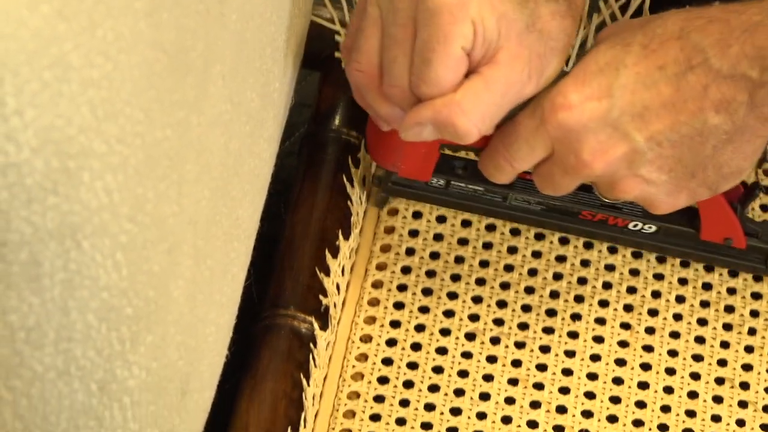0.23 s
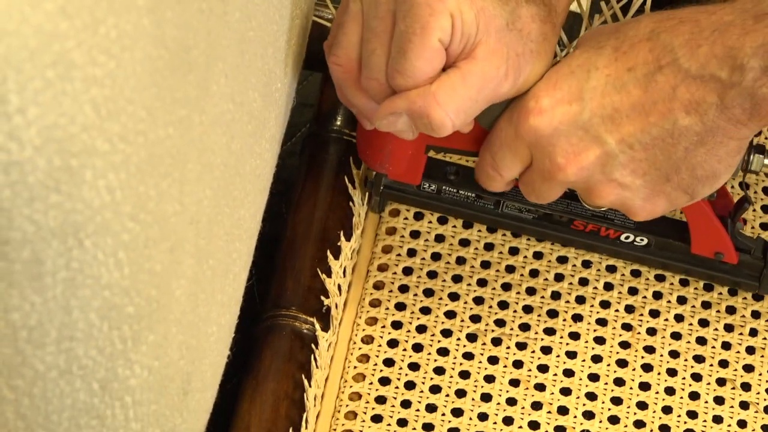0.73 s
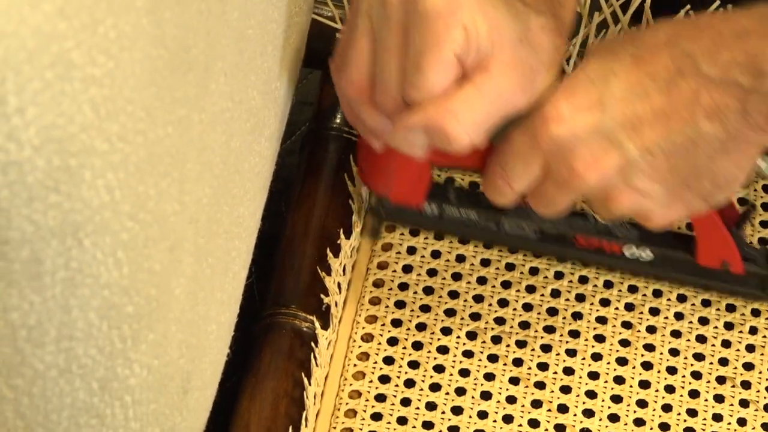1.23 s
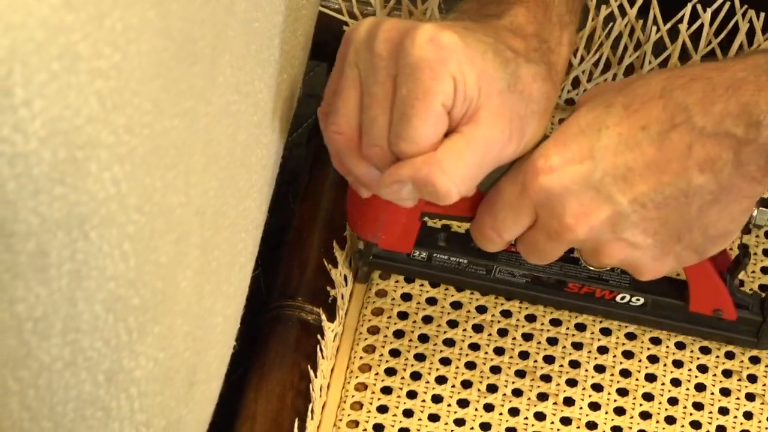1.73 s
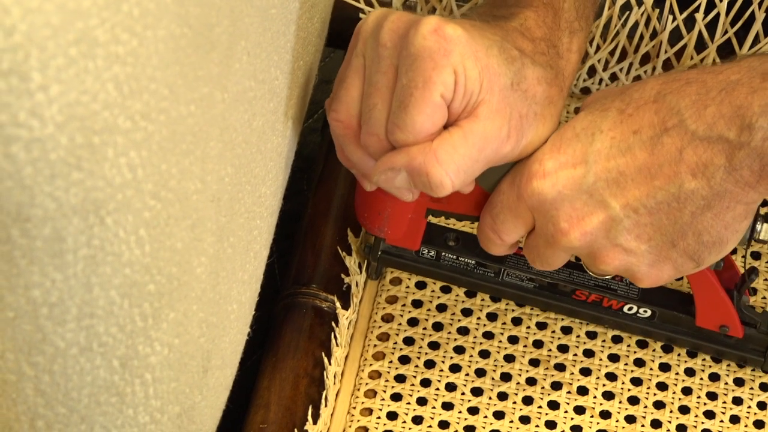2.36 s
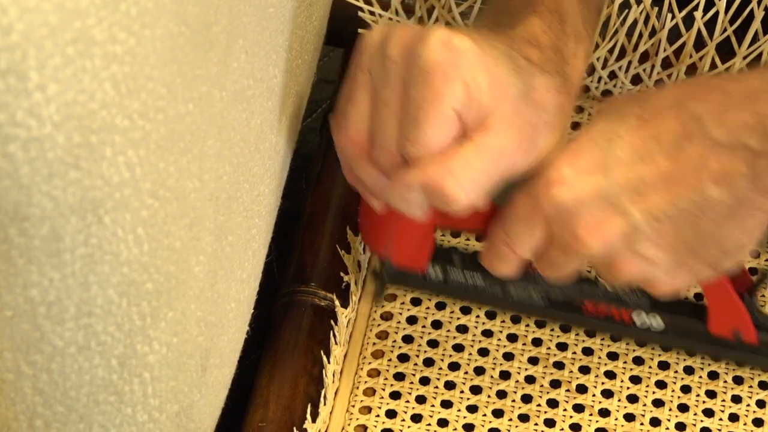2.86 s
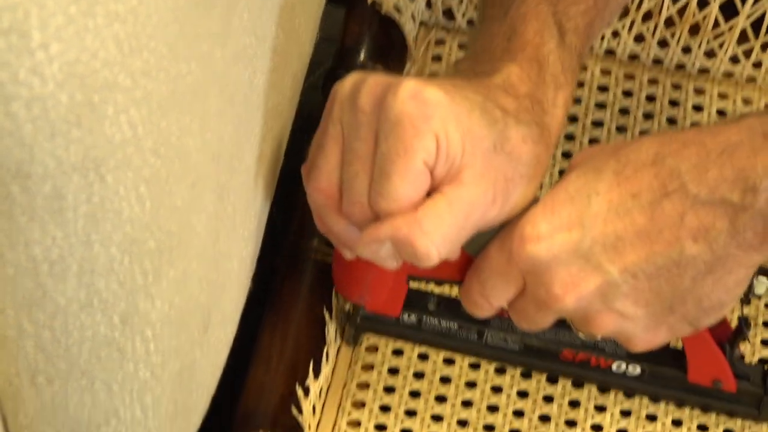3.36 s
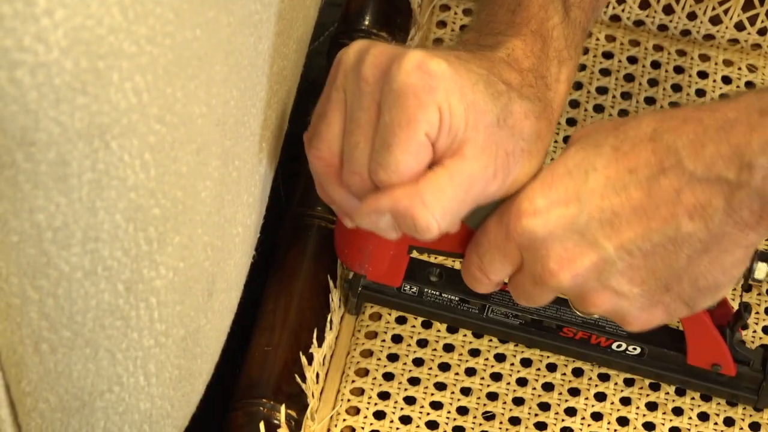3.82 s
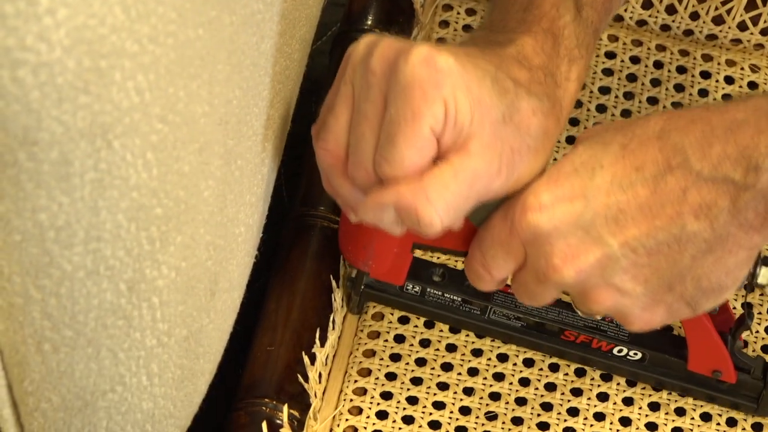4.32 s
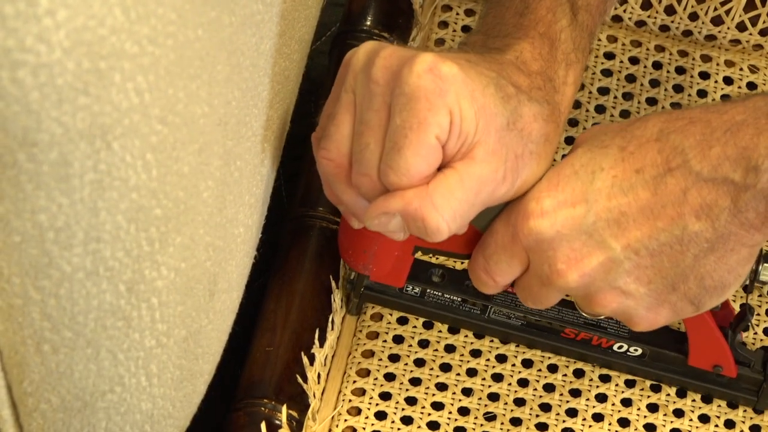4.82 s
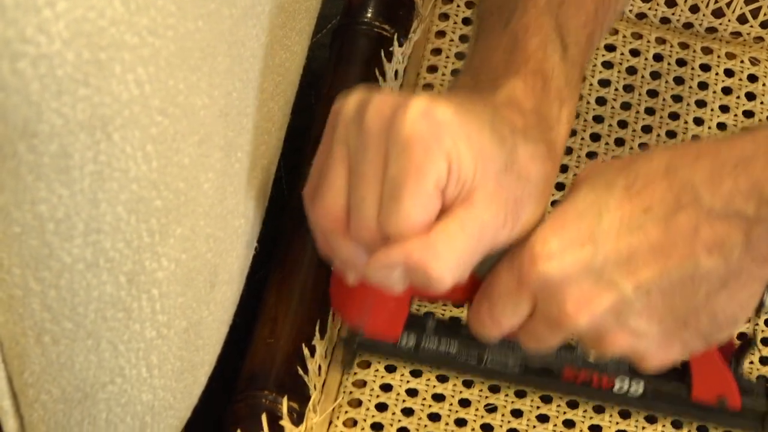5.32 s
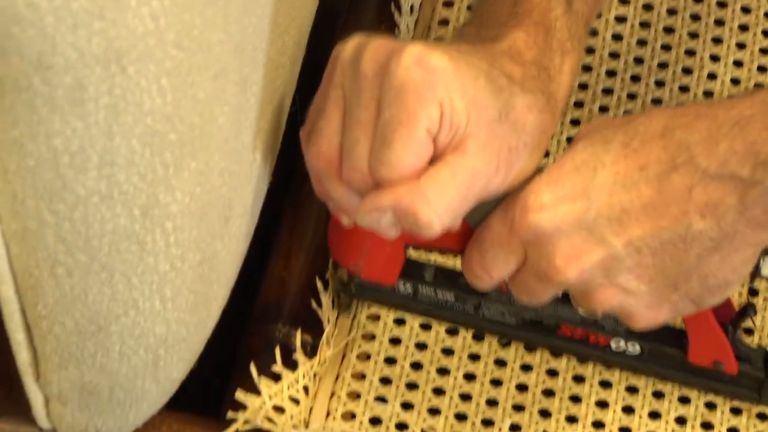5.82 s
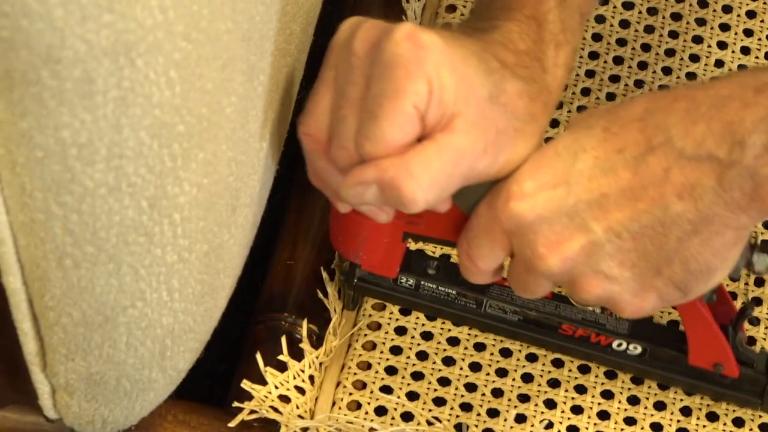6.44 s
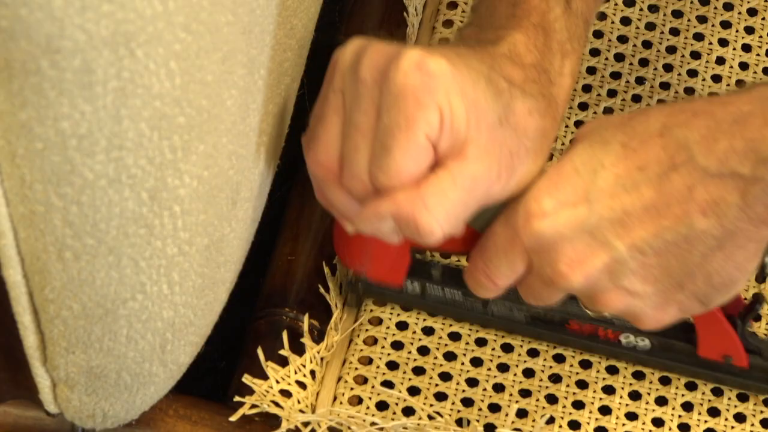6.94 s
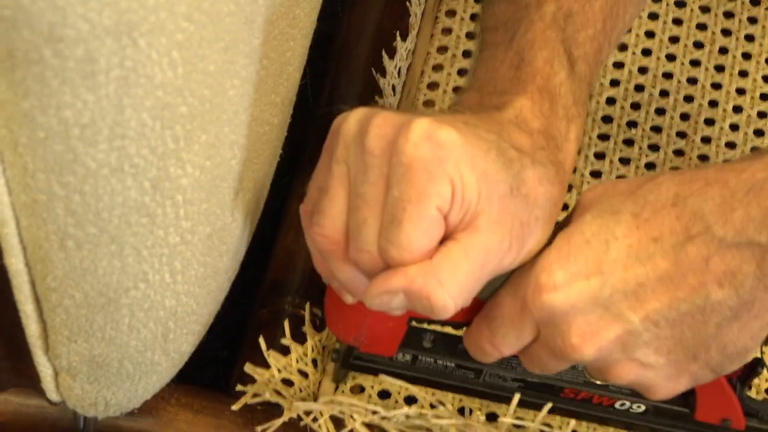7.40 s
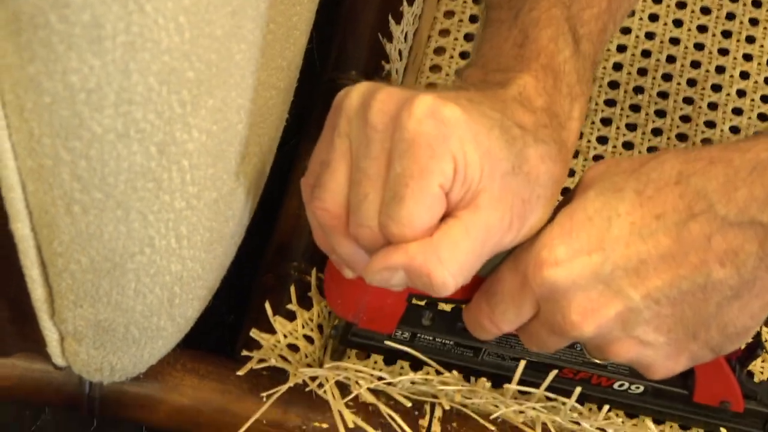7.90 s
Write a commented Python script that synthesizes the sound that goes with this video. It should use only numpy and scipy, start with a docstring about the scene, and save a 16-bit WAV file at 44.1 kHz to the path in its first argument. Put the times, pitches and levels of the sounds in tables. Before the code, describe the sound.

A close, mostly centred stereo view of an air stapler working on a wooden chair with cane webbing, in a lively workshop. Low motor hum, rumble and soft hiss run throughout, the hum drifting in level. Faint rubs, taps and dry ticks open the scene. At about 1.0 s a quick air spit leads into a loud, compressed crack with woody boom, an uneven exhaust rush, then a clack and snap a tenth of a second later; a trigger click follows at 1.4. A second shot lands at 2.7 after a longer spit. A small metallic rattle at 3.4 and soft knocks precede the third, at 5.0, its spit and rush stronger. Around 6.0 sharp little clicks and cane rubbing appear; the steel nose catches at 6.7, and the fourth shot at 6.8 booms heaviest with a higher metallic ring. Bright clicks at 7.2, then rubs and light taps to about 8.1.

```python
"""Four sharp cracks, each with a woody boom, a rush of air and a clack; clicks, rubs and a hum between them.
A pneumatic stapler fixes cane webbing to a wooden chair frame in a live workshop. Per shot: the trigger valve
spits, the driver slams the staple home, the cylinder exhausts, the piston clacks back. Air and contacts are
coloured noise, often through resonators; the frame is decaying sine modes, the motor is steady sines. Room
reflections are decaying noise; the recorder's limiter squashes the blows."""
import sys
import numpy as np
from scipy import signal
from scipy.fft import rfft, irfft
from scipy.io import wavfile
from scipy.ndimage import uniform_filter1d, minimum_filter1d

SR = 44100
rng = np.random.default_rng(int(sys.argv[2]) if len(sys.argv) > 2 else 0)


def transcribe(u):
    """Save the signal u as a 16-bit wav file named by the first command-line argument.

    u: samples, shape (n,) or (channels, n), limited to [-1, 1]; the rate is SR.
    q: integer samples, one column per channel.
    """
    v = np.clip(np.atleast_2d(u).T, -1, 1)
    q = np.round(v * 32767).astype(np.int16)
    wavfile.write(sys.argv[1], SR, q)


N = 360297
TIME_S = np.arange(N) / SR

# Shots. Each row: driver strike in seconds, trigger hold in seconds, valve lead in seconds, spit in dB,
# crack in dB, push on the frame in dB, rush in dB, rail pitch in Hz, rail ring in dB.
SHOTS = [(1.0367, 0.088, 0.04, -15, 2, -8.5, -11.5, 646, -16.5),
         (2.6817, 0.11, 0.085, -13.5, -1, -7, -15.5, 607, -14),
         (5.025, .1032, .051, -9, 2.5, -12, -9.5, 462, -10.5),
         (6.800, 0.11, 0.044, -14, -0.5, 0, -11.5, 1060, -8.5)]
# Driver blow. Each row: frequency in Hz, relative density in dB per Hz.
CRACK_SPECTRUM = [(30, -18), (100, 2), (350, -2), (700, -2), (1100, 11.5), (2000, 3), (5000, -6.5),
                  (8000, -7.5), (10500, -13), (13500, -13), (16000, -81)]
# Piston return. Each row: frequency in Hz, relative density in dB per Hz.
CLACK_SPECTRUM = [(30, 1), (200, 13.5), (600, -5.5), (1200, 14), (2600, 2), (5500, 3.5), (8500, -1),
                  (10500, -3.5), (13500, -1), (16000, -21)]
# Valve reseating and cane ticks. Each row: frequency in Hz, relative density in dB per Hz.
SNAP_SPECTRUM = [(30, -23), (600, -1), (1500, -12), (3500, 3), (5500, 5), (8500, -3.5), (10500, -32),
                 (13500, -11), (16000, -51)]
# Stapler housing resonances. Each row: centre in Hz, width in Hz, relative level in dB.
HOUSING_MODES = [(597, 60, -3), (897, 50, -18), (1013, 94, -4), (1340, 42, -12.5), (1437, 62, 0),
                 (1549, 67, -0.5), (1975, 56, 2), (2350, 280, -12), (3600, 290, -6)]
# Chair frame modes. Each row: frequency in Hz, level in dB, 60 dB decay time in seconds.
FRAME_MODES = [(101.4, -22.5, 0.5), (117.6, -18, 0.97), (156.6, -4.5, 0.29), (170.9, -10.5, 0.46),
               (204.4, -16.5, 0.74), (235.7, -26.5, 0.8), (271.8, -15.5, 0.47), (309.4, -17.5, 0.59),
               (336.3, -25, 0.48), (419.3, -35.5, 0.45), (467, -25, 0.19), (534, -26.5, 0.2)]
# Cylinder exhaust. Each row: frequency in Hz, relative density in dB per Hz.
RUSH_SPECTRUM = [(30, -30), (100, 1.5), (280, -3.5), (600, 0), (1100, -3), (2000, -3.5), (5000, -5.5),
                 (8000, -12.5), (10300, -19), (13000, -17), (16000, -30)]
# Trigger valve jet. Each row: frequency in Hz, relative density in dB per Hz.
SPIT_SPECTRUM = [(35, -37), (150, 1), (800, -7.5), (1500, -0.5), (2000, -9), (3500, 1), (7000, 4.5),
                 (10500, 3), (13500, 4), (16000, 2)]
# Tool set down or knocked, wood and cane rubbed. Each row: start in seconds, level in dB, centre in Hz,
# fade in seconds.
TAPS = [(.311, -39.5, 514, .035), (.066, -33, 2300, .003), (.378, -37, 13000, .0036),
        (0.712, -33.5, 5800, .0072), (0.9015, -37, 2190, 0.025), (1.62, -39.5, 5800, 0.057),
        (2.322, -44, 1640, 0.068), (2.578, -26.5, 1750, 0.0064), (3.409, -35, 4250, 0.045),
        (3.547, -33.5, 1160, 0.077), (3.633, -31, 6500, 0.0023), (3.835, -32, 610, 0.028),
        (4.913, -35.5, 1410, .033), (5.968, -26, 5070, 0.018), (6.0043, -15, 6550, 0.00087),
        (6.0286, -32.5, 1880, 0.014), (6.1333, -28.5, 2320, 0.0045), (6.551, -36, 3830, 0.037),
        (7.171, -23, 4500, 0.014), (7.192, -19.5, 2450, 0.0047), (7.552, -33.5, 3740, 0.042),
        (7.713, -33.5, 2650, 0.011), (8.0303, -36.5, 4540, 0.0055), (8.08, -33, 2170, 0.0062)]
# Staple magazine rattles. Each row: start in seconds, level in dB.
CLINKS = [(3.416, -36)]
# Steel magazine resonances. Each row: centre in Hz, width in Hz, relative level in dB.
MAGAZINE_MODES = [(3520, 270, -9), (5540, 600, -3), (6400, 260, -2), (7540, 200, 0), (12200, 1500, -21)]
# Tool nose snaps down or drags. Each row: start in seconds, level in dB, fade in seconds.
CATCHES = [(6.6638, -25, 0.018), (6.676, -25, 0.033), (7.22, -49, 0.093), (7.471, -53, 0.099)]
# Steel nose resonances. Each row: centre in Hz, width in Hz, relative level in dB.
NOSE_MODES = [(516, 40, 3), (865, 65, -3), (1420, 300, -9), (2290, 330, 4), (3600, 210, -11),
              (4020, 250, -15), (5460, 1000, -46)]
# Trigger springs back. Each row: start in seconds, level in dB.
TRIGGER_CLICKS = [(1.4167, -31), (7.5617, -40)]
# Trigger resonances. Each row: centre in Hz, width in Hz, relative level in dB.
TRIGGER_MODES = [(960, 150, -1), (1470, 230, 2), (3330, 410, -2), (5360, 370, 0), (8500, 650, -8.5),
                 (12800, 2500, -16)]
# Hands slide over cane and frame. Each row: start in seconds, level in dB, fade in seconds.
RUBS = [(0, -38, 0.096), (.3, -52.5, 0.9), (.85, -51, 0.21), (1.95, -56, .25), (3.55, -48.5, 0.24),
        (6.0, -42, 0.2), (7.2, -41.5, 0.24), (7.85, -50.5, 0.97)]
# Sliding friction. Each row: frequency in Hz, relative density in dB per Hz.
RUB_SPECTRUM = [(40, -4.5), (200, 3.5), (400, 3), (800, -5), (2400, -9), (6000, -13), (10000, -25.5),
                (16000, -31)]
# Motor lines. Each row: frequency in Hz, relative level in dB.
HUM_LINES = [(59.2, 1), (118.4, -2.5), (177.6, -4.5), (236.9, -7.5)]
# Hum level over time. Each row: time in seconds, level in dB.
HUM_LEVEL = [(0.0, -63), (0.91, -46), (1.32, -53), (3.43, -59), (4.12, -47), (4.69, -51), (6.67, -58.5),
             (8.17, -50)]
# Workshop air noise. Each row: frequency in Hz, relative density in dB per Hz.
AIR_SPECTRUM = [(15, -10), (25, -4.5), (59, 3), (185, 1.5), (236, -1), (285, -7.5), (659, -17),
                (1020, -17.5), (1190, -19), (2350, -25.5), (5000, -27), (9840, -38), (12900, -32.5),
                (14800, -42), (16000, -92)]
# Reflection colour. Each row: frequency in Hz, gain in dB.
ROOM_COLOUR = [(35, -31), (70, -7), (200, 9), (600, -2), (2000, -7.5), (6000, -6), (10000, -5.5),
               (16000, -1)]
# Reverberation. Each row: frequency in Hz, 60 dB decay time in seconds.
ROOM_T60 = [(100, 1), (300, 0.78), (1000, 0.59), (3000, 0.84), (6000, 0.84), (10000, 0.56), (16000, 0.51)]
# Channel balance by band. Each row: frequency in Hz, left minus right in dB.
BALANCE = [(30, 2), (60, 5), (140, 7), (210, 5), (330, 2.5), (500, .3), (1200, .3), (2000, 0)]
# Stereo width by band. Each row: frequency in Hz, side gain in dB.
WIDTH = [(60, -40), (500, -18), (1200, -26), (2500, -40.5), (4500, -43), (6400, -17), (9300, -7.5),
         (11000, -17), (16000, -70)]

# Driver meets the staple, drives it home, hits its stop; levels relative to the main blow.
MEET_LEAD_S, MEET_CRACK_DB, MEET_PUSH_DB = 0.0045, -5, -18.5
STOP_LAG_S, STOP_CRACK_DB, STOP_PUSH_DB = 0.012, -7, -6
# On release the piston clacks back, then the valve snaps onto its seat.
CLACK_DB, CLACK_PUSH_DB = -8.5, -17.5
RESEAT_LAG_S, RESEAT_DB, RESEAT_PUSH_DB = 0.0148, -11, -9.5
RAIL_WIDTH_HZ, HOUSING_DB = 57, -7.5
RUSH_FADE_S = 0.073
# The jet swells for a share of its lead and shuts before the blow; a weaker one vents around the release.
SWELL_SHARE, SHUT_LEAD_S = 0.67, 0.0083
VENT_LEAD_S, VENT_SWELL_S, VENT_HOLD_S, VENT_DB = 0.016, 0.0067, 0.028, -26
MAGAZINE_RING_DB, MAGAZINE_RING_S = -17, 0.12  # spring buzz, relative to the clink
FRICTION_GRAIN_DB = 2.5
RUMBLE_DB, HISS_DB = -47.5, -52.5
CUTOFF_HZ = 15900


def piston():
    """Driver cracks, and return clacks and snaps; all rattle the housing, each staple rings the rail."""
    blows, returns, reseats = strokes()
    cracks = colour(contacts(blows, fade_s=0.0033), CRACK_SPECTRUM)
    for strike_s, *_, rail_hz, rail_db in SHOTS:
        rail = resonate(burst(fade_s=0.018), [(rail_hz, RAIL_WIDTH_HZ, 0)])
        add(cracks, strike_s, from_db(rail_db) * rail)
    clacks = colour(contacts(returns, fade_s=0.0069), CLACK_SPECTRUM)
    clacks += colour(contacts(reseats, fade_s=0.0038), SNAP_SPECTRUM)
    housing = resonate(contacts(blows + returns + reseats, fade_s=0.0038), HOUSING_MODES)
    return cracks + from_db(HOUSING_DB) * housing, clacks


def strokes():
    """Contacts as rows (seconds, dB, push on the frame in dB): blows, returns, reseats."""
    blows, returns, reseats = [], [], []
    for strike_s, held_s, _, _, crack_db, push_db, *_ in SHOTS:
        release_s = strike_s + held_s
        blows += [
            (strike_s - MEET_LEAD_S, crack_db + MEET_CRACK_DB, push_db + MEET_PUSH_DB),
            (strike_s, crack_db, push_db),
            (strike_s + STOP_LAG_S, crack_db + STOP_CRACK_DB, push_db + STOP_PUSH_DB),
        ]
        returns.append((release_s, CLACK_DB, CLACK_PUSH_DB))
        reseats.append((release_s + RESEAT_LAG_S, RESEAT_DB, RESEAT_PUSH_DB))
    return blows, returns, reseats


def chair():
    """Every stroke is an impulse on the frame, which booms in its decaying modes."""
    pushes, t = np.zeros(N), TIME_S[:SR]
    for s, _, push_db in sum(strokes(), []):
        pushes[round(s * SR)] = from_db(push_db)
    ring = np.zeros(SR)
    for hz, db, t60_s in FRAME_MODES:
        ring += from_db(db) * np.sin(2 * np.pi * hz * t) * np.exp(-np.log(1000) * t / t60_s)
    return butter_filter(signal.oaconvolve(pushes, ring)[:N], 2, 90, "high")


def exhaust(flutter_db=2.5):
    """Turbulent air leaves the cylinder in uneven puffs as its pressure falls."""
    rush = np.zeros(N)
    for strike_s, *_, rush_db, _, _ in SHOTS:
        add(rush, strike_s, from_db(rush_db) * burst(RUSH_FADE_S))
    flutter = from_db(flutter_db * grain(size=120) - 3.5)
    return colour(rush * flutter, RUSH_SPECTRUM)


def valve(rise_db, shut_s):
    """On pull and on release an air jet swells, holds and stops quickly."""
    jet, t = np.zeros(N), TIME_S[:SR // 2]

    def spit(swell_s, open_s, db):
        """Envelope of one jet."""
        closed = np.clip(1 - t / swell_s, 0, 1)
        shutting = np.exp(-np.maximum(t - open_s, 0) / shut_s)
        return from_db(db - rise_db * closed ** 1.41) * shutting

    for strike_s, held_s, lead_s, spit_db, *_ in SHOTS:
        pull = spit(SWELL_SHARE * lead_s, lead_s - SHUT_LEAD_S, spit_db)
        vent = spit(VENT_SWELL_S, VENT_SWELL_S + VENT_HOLD_S, VENT_DB)
        add(jet, strike_s - lead_s, pull)
        add(jet, strike_s + held_s - VENT_LEAD_S, vent)
    return jet * colour(rng.standard_normal(N), SPIT_SPECTRUM)


def handling():
    """Small contact and friction sounds of tool, trigger, hands and cane."""
    small = taps() + rubs(attack_s=0.0052) + magazine() + nose()
    small += resonate(contacts(TRIGGER_CLICKS, fade_s=0.0074), TRIGGER_MODES)
    return small + cane(per_s=7.9, level_db=-54)


def taps():
    """Band-limited noise knocks and rubs of wood and cane; longer ones start more softly."""
    out = np.zeros(N)
    for s, db, hz, fade_s in TAPS:
        swell = 1 - np.exp(-TIME_S[:SR // 2] / (0.5 * fade_s))
        band_hz = [hz / 1.94, min(hz * 1.084, 0.45 * SR)]
        knock = butter_filter(swell * burst(fade_s), 1, band_hz, "band")
        add(out, s, from_db(db) * np.sqrt(SR / hz / 2) * knock)  # offsets the power lost in narrow bands
    rough = out * from_db(FRICTION_GRAIN_DB * grain(size=90))
    return butter_filter(rough, 1, 9000, "low")


def magazine():
    """The staple magazine's steel rings to a short rattle while its spring goes on buzzing."""
    rattle = contacts(CLINKS, fade_s=0.008)
    buzz = contacts(CLINKS, fade_s=MAGAZINE_RING_S)
    return resonate(rattle + from_db(MAGAZINE_RING_DB) * buzz, MAGAZINE_MODES)


def nose():
    """The steel nose rings to noise bursts as it snaps down or drags."""
    catch = np.zeros(N)
    for s, db, fade_s in CATCHES:
        add(catch, s, from_db(db) * burst(fade_s))
    return resonate(catch, NOSE_MODES)


def rubs(attack_s):
    """Skin sliding on cane: soft noise that rises and dies away."""
    level = np.zeros(N)
    for s, db, fade_s in RUBS:
        add(level, s, from_db(db) * (1 - np.exp(-TIME_S / attack_s)) * np.exp(-TIME_S / fade_s))
    return level * colour(rng.standard_normal(N), RUB_SPECTRUM)


def cane(per_s, level_db):
    """Dry strands tick faintly, at random times and strengths, under the hands."""
    strength_db = 2.4 * np.minimum(rng.exponential(1, N), 2)
    ticks = (rng.random(N) < per_s / SR) * from_db(strength_db)
    return from_db(level_db) * colour(signal.oaconvolve(ticks, burst(fade_s=0.0052))[:N], SNAP_SPECTRUM)


def workshop(x, build_s):
    """Diffuse reflections build up and die away, each band at its own rate."""
    t, edges_hz = TIME_S[:SR], np.geomspace(40, 18000, 13)
    white, hz = rfft(rng.standard_normal(SR)), np.fft.rfftfreq(SR, 1 / SR)
    tail = np.zeros(SR)
    for low, high in zip(edges_hz, edges_hz[1:]):
        band = irfft(white * (hz >= low) * (hz < high), SR)
        t60_s = at_hz(ROOM_T60, np.sqrt(low * high))
        tail += band * np.exp(-np.log(1000) * t / t60_s)
    tail *= 1 - np.exp(-t / build_s)
    response = colour(tail / np.linalg.norm(tail), ROOM_COLOUR, keep_power=False)
    return signal.oaconvolve(x, response)[:N]


def motor():
    """Steady sines at a motor's turning rate and its first multiples, with a drifting level."""
    lines = np.zeros(N)
    for hz, db in HUM_LINES:
        lines += from_db(db) * np.sqrt(2) * np.sin(2 * np.pi * (hz * TIME_S + rng.random()))
    return lines * from_db(np.interp(TIME_S, *np.transpose(HUM_LEVEL)))


def room_air(rumble_db, hiss_db):
    """Steady workshop rumble and hiss: coloured noise split at 600 Hz."""
    noise = colour(rng.standard_normal(N), AIR_SPECTRUM)
    rumble = rms_one(butter_filter(noise, 2, 600, "low"))
    hiss = rms_one(butter_filter(noise, 2, 600, "high"))
    return rumble * from_db(rumble_db) - hiss * from_db(hiss_db)  # minus avoids a notch at the split


def from_db(db):
    """Decibels to gain."""
    return 10 ** (np.asarray(db) / 20)


def rms_one(x):
    """Scale to unit power."""
    return x / np.sqrt(np.mean(x ** 2) + 1e-20)


def at_hz(points, hz):
    """Read a table on a log-frequency axis."""
    f, value = np.transpose(points)
    return np.interp(np.log(np.maximum(hz, 1)), np.log(f), value)


def butter_filter(x, order, hz, kind):
    """Causal Butterworth filter."""
    return signal.sosfilt(signal.butter(order, hz, kind, fs=SR, output="sos"), x)


def colour(x, spectrum, keep_power=True, size=8192):
    """Causal minimum-phase filter with the given spectrum."""
    gain = from_db(at_hz(spectrum, np.fft.rfftfreq(size, 1 / SR)))
    cepstrum = irfft(np.log(gain))
    cepstrum[1:size // 2] *= 2
    cepstrum[size // 2 + 1:] = 0
    pulse = irfft(np.exp(rfft(cepstrum)))
    if keep_power:
        pulse = pulse / np.linalg.norm(pulse)
    return signal.oaconvolve(x, pulse)[:len(x)]


def resonate(x, modes):
    """Parallel resonances (Hz, width in Hz, dB); white noise keeps its power."""
    kick = signal.unit_impulse(SR // 4)
    pulse = np.zeros(len(kick))
    for hz, width_hz, db in modes:
        pulse += from_db(db) * signal.lfilter(*signal.iirpeak(hz, hz / width_hz, fs=SR), kick)
    return signal.oaconvolve(x, pulse / np.linalg.norm(pulse))[:len(x)]


def add(track, s, sound):
    """Mix a sound in at a time in seconds."""
    start = max(round(s * SR), 0)
    track[start:start + len(sound)] += sound[:N - start]


def burst(fade_s):
    """Noise that starts at once and dies away."""
    t = TIME_S[:SR // 2]
    return rng.standard_normal(len(t)) * np.exp(-t / fade_s)


def contacts(rows, fade_s):
    """A noise burst for each row of (seconds, dB)."""
    out = np.zeros(N)
    for s, db, *_ in rows:
        add(out, s, from_db(db) * burst(fade_s))
    return out


def grain(size):
    """Quick random swings of spread 1, smoothed over size samples."""
    return rms_one(uniform_filter1d(rng.standard_normal(N), size))


def scene():
    """Near sounds sit mid; room sound adds width by band, and the left channel takes more bass."""
    cracks, clacks = piston()
    frame, rush, jet, small = chair(), exhaust(), valve(rise_db=35, shut_s=0.0024), handling()
    to_room = from_db(-2.0) * cracks + from_db(-2.5) * clacks + from_db(-7.0) * jet
    to_room += from_db(-8) * rush + from_db(-1.5) * small
    near = cracks + clacks + jet + rush + frame + small + workshop(to_room, build_s=0.003)
    near = butter_filter(near, 2, 65, "high")  # small bodies radiate little deep bass
    mid = near + room_air(RUMBLE_DB, HISS_DB) + motor()
    wide = workshop(to_room + from_db(11) * jet, build_s=0.00067)
    wide += room_air(rumble_db=-61, hiss_db=-41)
    side = colour(wide, WIDTH, keep_power=False)
    ratio = from_db(at_hz(BALANCE, np.fft.rfftfreq(2 * N, 1 / SR)))
    side += irfft(rfft(mid, 2 * N) * (ratio - 1) / (ratio + 1))[:N]
    return np.array([mid + side, mid - side])


def limiter(x, ceiling_db, release_db_per_s, size=128):
    """Gain drops just ahead of each peak and recovers quickly at a fixed rate."""
    over_db = np.maximum(20 * np.log10(np.abs(x).max(axis=0) + 1e-9) - ceiling_db, 0)
    release_db = release_db_per_s * TIME_S
    cut_db = np.maximum.accumulate(over_db + release_db) - release_db
    return x * from_db(uniform_filter1d(minimum_filter1d(-cut_db, size), 2 * size))


def record(dry):
    """Limiter, rounded peaks, and the top cut off."""
    held = np.tanh(limiter(dry, ceiling_db=-1.5, release_db_per_s=206))
    return signal.sosfilt(signal.ellip(12, 0.1, 80, CUTOFF_HZ, fs=SR, output="sos"), held)


dry = scene()
out = record(dry)
transcribe(out)
```